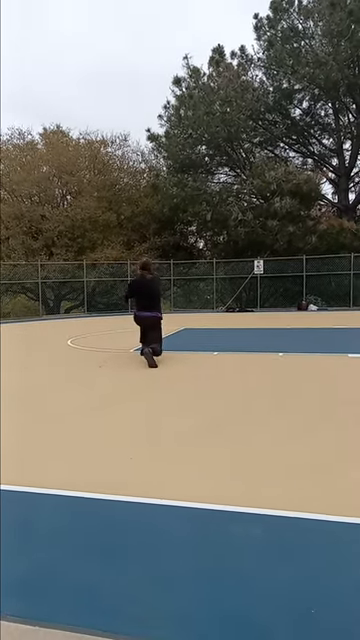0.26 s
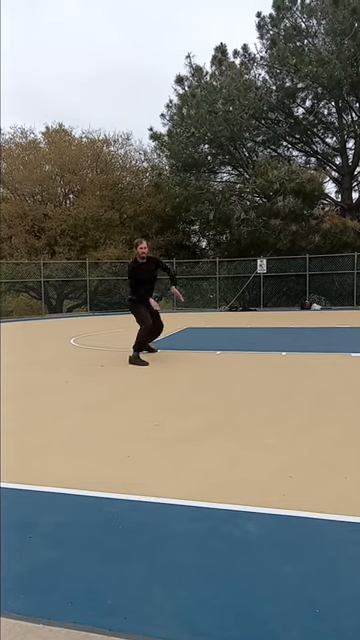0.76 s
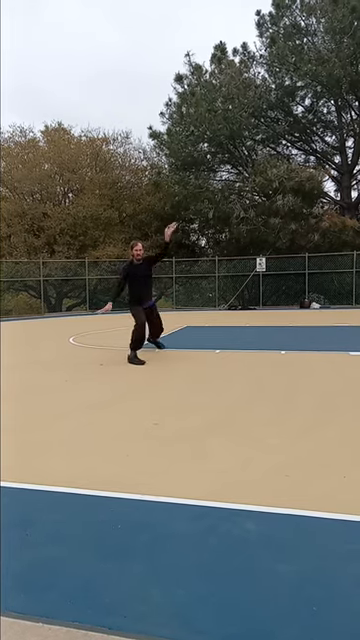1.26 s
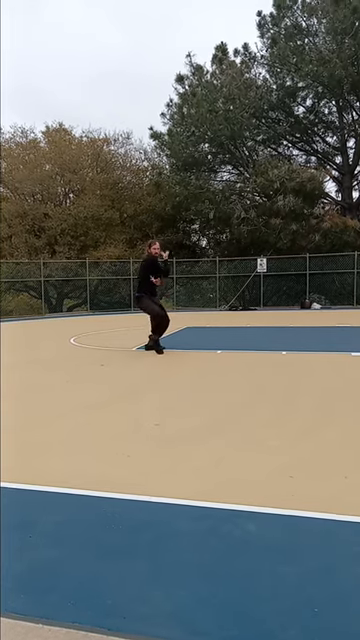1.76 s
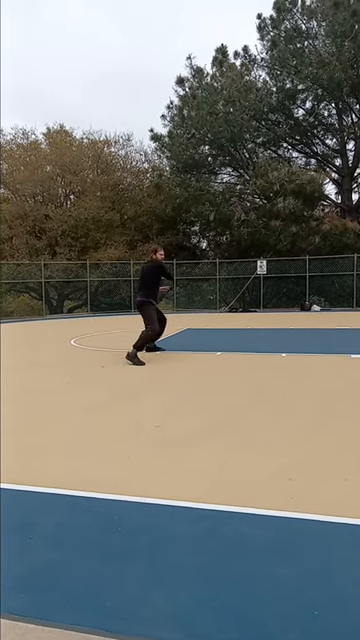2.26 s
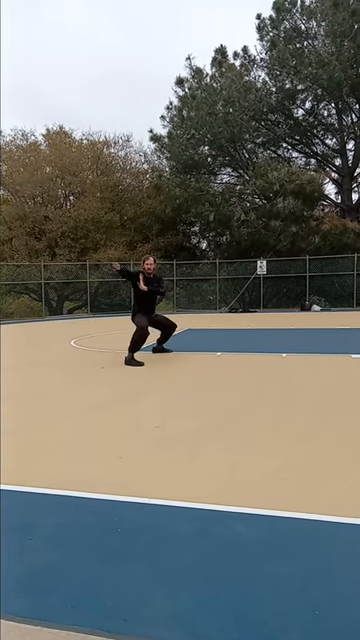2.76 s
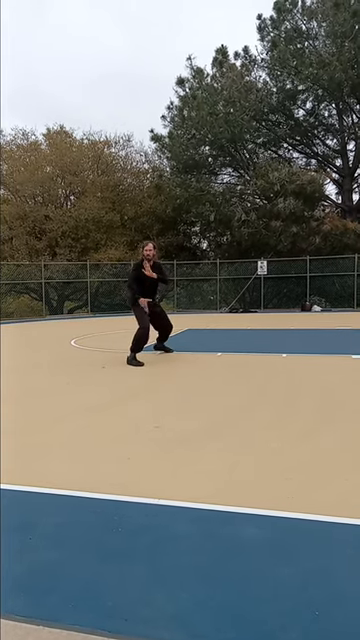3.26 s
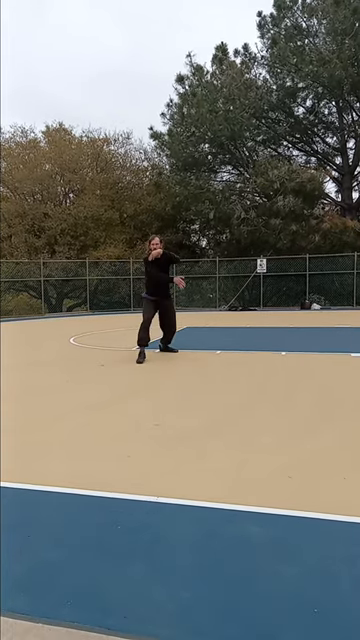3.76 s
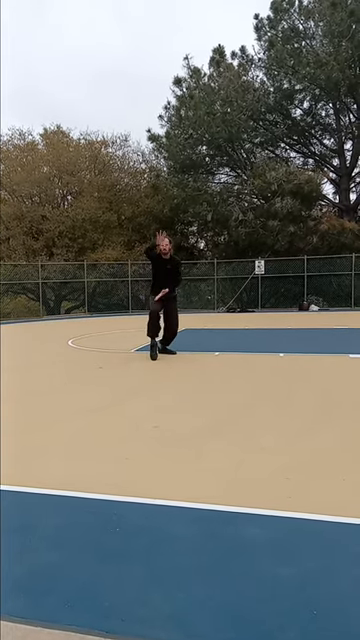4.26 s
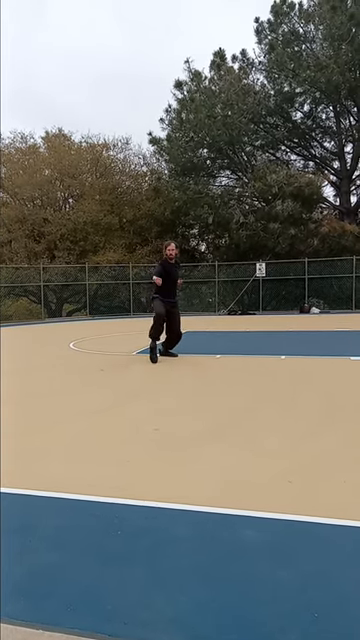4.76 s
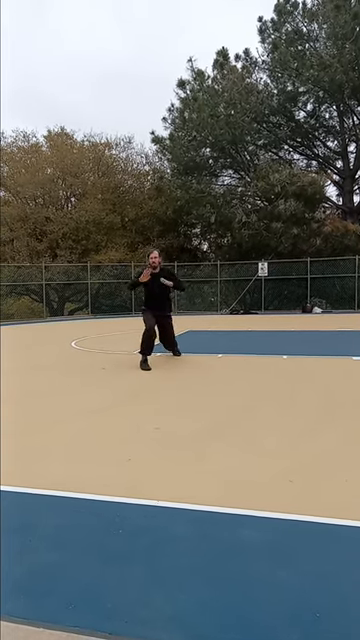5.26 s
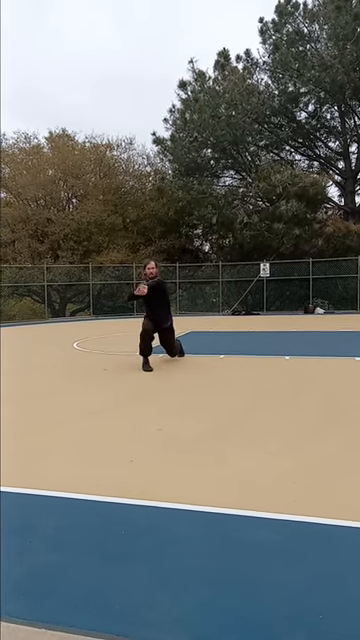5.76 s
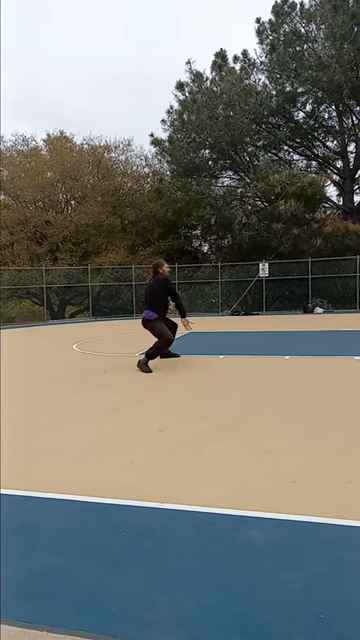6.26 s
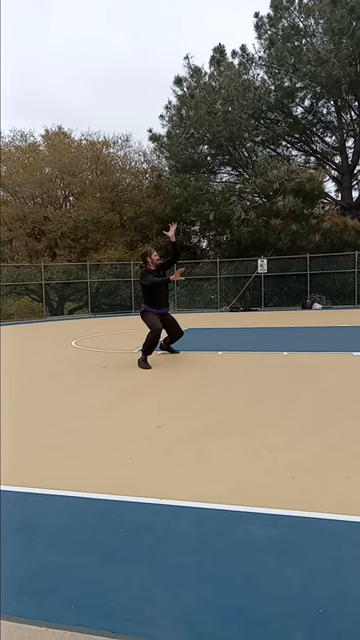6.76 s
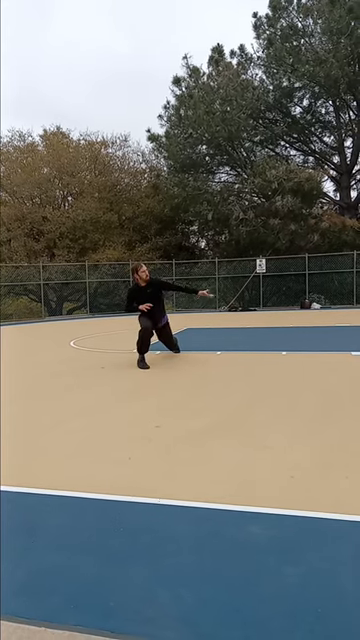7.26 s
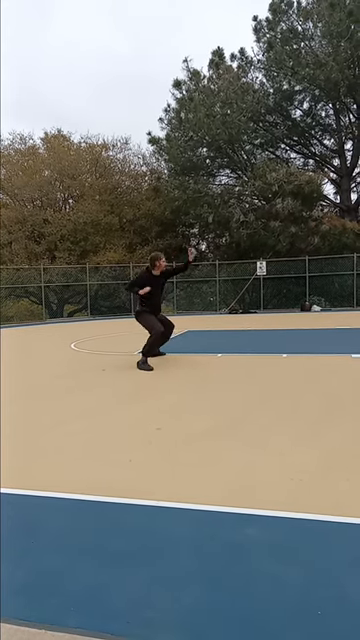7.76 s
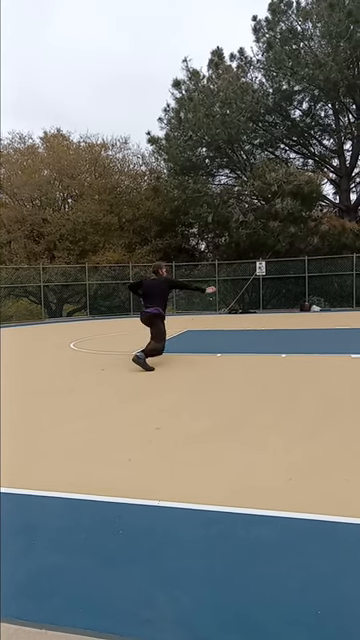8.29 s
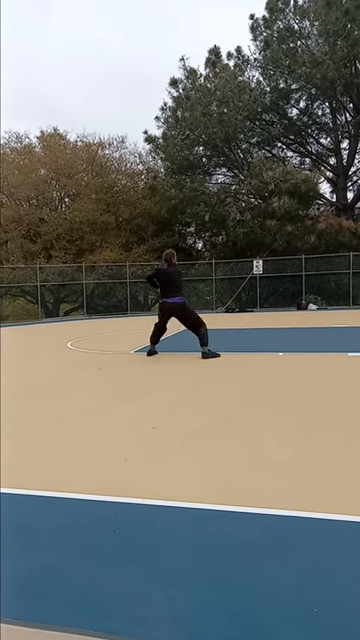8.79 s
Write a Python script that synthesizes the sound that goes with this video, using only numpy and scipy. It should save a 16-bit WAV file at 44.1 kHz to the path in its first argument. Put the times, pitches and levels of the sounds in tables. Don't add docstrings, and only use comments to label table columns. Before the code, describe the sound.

Dry rubber-soled scrapes with grit clicks and dull heel knocks, heard from a few metres away in open air with little echo. Landings are loudest in the first second and a half; the middle is mostly birds, quiet scuffs and a hissy sleeve swish; a sharp stamp comes close to the end. Faint wind puffs and a far vehicle sit underneath.

```python
import sys
import numpy as np
from scipy import signal
from scipy.fft import rfft, irfft, next_fast_len
from scipy.io import wavfile
from scipy.ndimage import uniform_filter1d, map_coordinates

SR = 44100
rng = np.random.default_rng(int(sys.argv[2]) if len(sys.argv) > 2 else 0)


def inscribe(sig):
    pcm = np.round(np.clip(np.atleast_2d(sig).T, -1, 1) * 32767)
    wavfile.write(sys.argv[1], SR, pcm.astype(np.int16))


def linear_from_db(decibels):
    return 10 ** (np.asarray(decibels, float) / 20)


N = 398214

# frequency in Hz, density in dB per Hz.
TOWN_COLOUR_DB = [(15, -21.5), (25, -32.5), (74, 0), (130, 2.5), (195, -2.5), (531, -24), (936, -17),
                  (1260, -19.5), (2550, -27.5), (4740, -29.5), (5430, -28.5), (6740, -30), (8360, -51),
                  (13200, -59), (16000, -49)]
# time in seconds, level in dB.
TOWN_LEVEL_DB = [(0.0, -57.5), (1.0, -58.5), (9.03, -61.5)]
# centre in seconds, level in dB, length in seconds.
GUSTS = [(0.26, -52.5, 0.025), (1.094, -50.5, 0.055), (1.52, -51, 0.029), (2.536, -54.5, .07),
         (3.19, -50, 0.035), (5.78, -61, .12), (1.97, -57, .04), (4.27, -56, .04), (3.67, -54.5, 0.064),
         (4.4, -61, 0.058), (5.3, -57, 0.042), (7.55, -56.5, .07), (1.844, -59.5, .05), (7.3, -57, 0.047),
         (6.796, -57.5, 0.14), (8.624, -56, 0.24)]
# frequency in Hz, gain in dB.
MIC_DB = [(25, -19), (55, -2.5), (13500, 0.5), (14500, 3), (15700, -0.5), (15900, -57)]
# nearest, rise and fall in seconds, level in dB, firing rate in Hz, climb in Hz per second.
VEHICLE = (3.0, 1, 2, -69.5, 41, 4.5)

# start and length in seconds, start pitch in Hz, level in dB.
CHIPS = [(0, 0.02, 5220, -57.5), (.144, 0.019, 5180, -45.5), (.916, .024, 5120, -48.5),
         (2.043, 0.063, 5180, -55.5), (2.44, 0.064, 5440, -50), (2.651, 0.03, 5400, -47.5),
         (2.698, .11, 5240, -48), (2.879, 0.026, 5700, -45), (2.96, 0.07, 5150, -47.5),
         (3.213, 0.13, 5110, -46), (4.081, 0.033, 5710, -37.5), (4.709, 0.032, 5160, -47.5),
         (5.051, 0.0313, 5770, -34), (5.461, 0.051, 5250, -58.5), (5.997, 0.025, 5690, -34.5),
         (6.416, 0.026, 4960, -57.5), (7.933, 0.052, 5670, -57), (1.222, 0.037, 5600, -42.5),
         (3.435, 0.05, 5230, -44.5), (7.432, 0.04, 5470, -65), (8.18, 0.045, 5450, -62),
         (8.736, 0.036, 5800, -42)]
DEEP_CHIPS = [
    (7.496, 0.03, 5530, -42.5),
]
CHIP_END_HZ, DEEP_CHIP_END_HZ = 5000, 4840
# start and length in seconds, start and end pitch in Hz, level in dB.
SONG = [(1.906, 0.034, 3530, 3220, -55), (1.963, 0.0077, 2840, 3530, -53), (2.077, .026, 3540, 4000, -62),
        (2.102, .013, 4150, 2960, -56), (2.12, 0.0154, 3000, 3900, -56), (2.137, 0.0095, 3830, 2840, -50),
        (2.246, 0.021, 4040, 3960, -55), (2.264, 0.025, 3710, 3000, -47), (2.302, 0.031, 3200, 3330, -47),
        (2.41, .03, 4250, 4400, -58), (2.423, .035, 5300, 3900, -61), (2.53, 0.013, 3700, 2850, -46.5),
        (2.571, 0.012, 2650, 3500, -57), (2.602, 0.014, 3740, 2930, -45), (2.686, .026, 4900, 4620, -50),
        (2.708, 0.036, 4600, 3470, -54), (2.736, 0.025, 3610, 3300, -42), (2.761, 0.03, 3750, 4400, -49.5),
        (2.901, 0.016, 3870, 3060, -47.5), (2.921, 0.032, 3416, 3476, -43.5),
        (3.016, 0.034, 3970, 3730, -57), (3.2, .045, 4250, 3500, -64.5), (3.054, 0.063, 3510, 3590, -55),
        (3.147, 0.051, 5680, 4060, -50), (3.235, .12, 3430, 3330, -44), (3.458, 0.039, 5600, 4950, -44.5),
        (3.489, 0.068, 4950, 2830, -51), (3.62, 0.021, 2950, 2400, -64), (3.788, 0.059, 3220, 2420, -50.5),
        (3.949, 0.076, 3270, 2420, -48.5), (7.765, .045, 3200, 2980, -63),
        (7.922, 0.065, 3240, 2900, -61.5)]
FAR_BIRDS = [(.108, 0.036, 2860, 3600, -72), (.586, 0.12, 2825, 2650, -66), (.66, 0.17, 3630, 4100, -68.5),
             (1.49, 0.19, 7600, 7390, -66), (2.213, 0.028, 4520, 4460, -65),
             (3.212, 0.071, 7200, 6360, -68), (4.134, 0.097, 4280, 4100, -59.5),
             (4.243, 0.088, 4240, 4510, -70), (4.642, 0.084, 7760, 7800, -72),
             (5.985, 0.04, 4050, 4200, -68), (6.09, 0.086, 4390, 4306, -62.5),
             (6.45, 0.037, 3100, 3140, -70), (6.553, .071, 4380, 4530, -61.5),
             (6.62, 0.15, 7400, 7630, -72), (5.33, .045, 3780, 3700, -74), (7.6, .06, 3110, 2950, -64),
             (8.22, 0.03, 3450, 3380, -65), (6.06, .025, 3850, 3750, -71), (8.118, 0.055, 4400, 4260, -62),
             (8.19, .09, 4460, 4440, -63.5), (4.11, .06, 2950, 2900, -68), (4.33, .04, 3420, 3350, -72),
             (4.385, .035, 3100, 3020, -68), (4.23, .04, 3150, 3050, -73), (6.335, .035, 4450, 4400, -72),
             (6.37, .025, 3950, 3550, -72), (5.81, .025, 6100, 6050, -73), (7.36, .05, 3500, 3450, -70)]
# peak, rise and fall in seconds, level in dB, pitch in Hz.
FAST_TRILLS = [
    (1.673, 0.011, 0.13, -49.5, 5440),
    (1.751, 0.013, 0.13, -41.5, 5430),
    (3.975, .2, 0.2, -50, 5370),
    (4.07, 0.1, 0.015, -54.5, 5320),
    (6.31, 0.038, 0.106, -51.5, 5350),
    (8.07, 0.12, 0.086, -51.5, 5290),
]
SLOW_TRILLS = [
    (4.364, 0.2, 0.11, -54, 5340),
    (4.51, 0.017, 0.12, -58.5, 5430),
    (4.7, 0.059, 0.02, -53, 5340),
    (4.27, .02, .06, -54, 5340),
    (6.04, .02, .11, -61, 5080),
    (5.045, 0.041, 0.0089, -53, 5430),
    (8.54, .02, 0.16, -56, 5220),
    (8.69, 0.079, 0.037, -58, 5280),
    (9.02, 0.2, 0.015, -53, 5320),
]
# blur in Hz, depth in dB, droop in Hz, clear notes in dB.
FAST_TEXTURE = (295, 16.2, 30, -1)
SLOW_TEXTURE = (81, 6, 25, -12)
TRILL_PER_S = 27

# frequency in Hz, density in dB per Hz.
CLOTH_COLOUR_DB = [(290, -36), (500, 26), (1140, -6.5), (1440, -4), (2190, -5), (6330, -2.5), (8700, -23),
                   (13300, -49), (16000, -30)]
# fastest, rise and fall in seconds, 6-7.3 kHz hiss in dB, 1.3-2.8 kHz body over hiss in dB.
SWISHES = [(2.48, 0.19, 0.19, -45.5, -13.5), (5.183, 0.085, 0.077, -46, -4.5),
           (5.24, 0.05, 0.11, -60.5, 12), (6.945, 0.26, 0.07, -58.5, 0), (9.02, 0.25, 0.058, -54, -17),
           (7.6, .03, 0.099, -56.5, -6), (2.55, 0.13, 0.14, -64, 12), (5.245, .05, .035, -52, -5),
           (8.56, .03, .08, -63, -8), (.47, .08, .1, -62, -4), (1.55, .03, .1, -63, -3)]
# body in kHz, fine hiss in dB.
FABRICS = [(2.2, -9), (2.47, -5), (1.61, -14), (1.75, 1), (1.47, -7), (2, -8), (1.7, -14), (2.2, -5),
           (2.2, -8), (3, -8), (3.2, -18)]
# comb spacing at start and end in Hz, strength 0-1.
GROUND_ECHOES = [(815, 905, .55), (890, 890, .85), (900, 960, .5), (965, 985, .6), (880, 880, .45),
                 (1500, 1500, .5), (840, 900, .75), (890, 900, .85), (900, 930, .8), (870, 900, .6),
                 (880, 860, .6)]
SWISH_DEPTH_DB, SWISH_FILL_DB = 22.5, 11
# time in seconds, level
# in dB, centre in Hz.
BREATHY_LOW = [(4.47, -61, 4020), (4.56, -54.5, 3350), (4.68, -74, 3050)]
BREATHY_MID = [(6.84, -72, 3020), (6.95, -67, 3130), (7.05, -76, 2960), (7.16, -72, 2850)]
BREATHY_DEEP = [(6.86, -78, 1950), (6.91, -67, 1860), (7.04, -78, 1875)]
BREATHY_BASS = [(6.78, -75, 950), (6.93, -65, 800), (7.0, -81, 780)]
BREATHY_HIGH = [(6.77, -67, 6320), (6.94, -61, 6620), (7.09, -79, 6840)]

# start in seconds, level in dB, pitch in Hz.
THUDS = [(.277, -45, 1340), (.315, -55.5, 990), (.35, -58, 814), (1.305, -53, 1300), (2.36, -61, 750),
         (2.526, -53, 2150), (5.29, -65.5, 750), (2.66, -68, 900), (5.82, -66, 2400), (3.728, -56, 950),
         (7.279, -62, 3550), (7.284, -56, 1950), (7.305, -60, 1400), (8.04, -56, 1500), (3.042, -49, 1500),
         (3.085, -57, 1600), (3.398, -64, 1310), (8.474, -63, 726), (8.819, -52.5, 1400)]
THUD_S = 0.0096
# start in seconds, peak in dB, sharp 9 kHz ring and low knock over the tick in dB.
TICKS = [(1.956, -48.5, -23, -2), (2.0744, -58.5, -8, -10), (2.9851, -47.5, -43, -17),
         (3.2824, -62, -30, 5), (3.319, -46, -37, -18), (3.386, -52, -40, -7), (4.8087, -55.5, -28, 23.5),
         (4.9725, -48, -23, -13), (4.931, -65, -35, 2), (5.036, -41.5, -36, -28), (7.56, -39, -33, -2),
         (7.793, -64, -20, -8), (4.155, -66, -30, -15), (4.196, -64, -22.5, -12), (4.27, -66, -30, -15),
         (6.449, -55, -35, -8), (6.475, -55, -35, -14), (6.499, -55, -28, -12), (6.864, -60, 0, -1),
         (8.4716, -32, -25, -17), (8.894, -55, -34, -7), (1.017, -60, -30, 2), (1.184, -56, -30, -6),
         (5.73, -60, -30, -4), (6.427, -60, -30, -6), (8.018, -50, -30, 0), (8.829, -48, -30, -8),
         (8.928, -58, -30, -2), (.327, -30, -14, -10), (1.327, -30, -16, -10), (8.4826, -33, -12, -10)]

# frequency in Hz, density in dB per Hz.
SOLE_COLOUR_DB = [(290, -59), (500, -5), (1570, -12), (1820, -14.5), (2980, -6.5), (4090, -6), (4530, -2),
                  (5020, -4.5), (6420, 3.5), (8330, -24.5), (13300, -49.5), (16000, -30)]
# start and slide in seconds, 6-7.3 kHz hiss in dB, 1.3-2.8 kHz weight over hiss in dB,
# sole body in kHz.
SKIDS = [(.281, 0.02, -42, -8.5, 1.39), (.303, 0.04, -33.5, -7, 1.84), (.348, 0.037, -41.5, -8.5, 1.46),
         (1.271, 0.011, -37, -4.5, 2.2), (1.288, 0.034, -33.5, -9.5, 2.17), (2.389, 0.0032, -57, 1, 2.4),
         (3.04, 0.02, -55.5, -6, 1.5), (3.07, 0.03, -50.5, -15, 1.47), (3.525, 0.065, -44, -3.5, 2.3),
         (3.612, 0.085, -44, -3, 1.9), (3.7, 0.073, -45.5, -1.5, 1.63), (3.462, 0.035, -61, 5.5, 2.3),
         (8.642, .035, -55, -6, 2.77)]
MORE_SKIDS = [
    (1.33, 0.035, -31, -12, 2.4),
    (1.378, .015, -39.5, -7, 2.4),
    (1.402, 0.053, -38, -7.5, 1.95),
    (1.475, 0.033, -37, -5.5, 2.3),
]
DRAGS = [
    (.22, 0.027, -45, -14.5, 3.5),
    (1.49, 0.0082, -53, -28, 1.03),
    (2.313, 0.05, -46.5, 1.5, 1.84),
    (3.59, 0.0073, -39.5, -11, 1.9),
    (.42, 0.12, -57.5, -12, 2.1),
    (3.27, 0.28, -69, -20, 1.2),
    (4.03, 0.44, -76, -9, 1.9),
    (4.96, 0.095, -68, -14, 1.7),
]
STAMPS = [
    (1.956, .005, -59.5, -6, 1.34),
    (7.281, 0.022, -62, 8, 1.7),
    (8.474, 0.031, -34, -4.5, 2.08),
]
# rise in seconds, sag in dB per second, stop and settle in seconds, dust above 8 kHz in dB.
SKID_SHAPE = (0.022, 89, 0.015, 0.14, 1.5)
DRAG_SHAPE = (0.084, 7.4, 0.02, .03, 0.12)
STAMP_SHAPE = (.004, 40, .016, .07, -1)
# closest and half length in seconds, hiss
# and weight in dB, sole body in kHz.
BRUSHES = [(7.505, 0.019, -47.5, -7.5, 2.7), (7.522, 0.02, -43.5, -4, 2.8), (7.557, 0.012, -44, -0.5, 3.9),
           (7.571, 0.022, -46, -2.5, 3.9), (1.454, .007, -33.5, -1.5, 2.4), (3.8, 0.05, -63, -18, 3.1),
           (7.326, 0.023, -58.5, -13, 2.7), (8.028, 0.032, -51.5, 0, 2.74), (8.056, 0.041, -52, 4.5, 2.18),
           (.59, 0.071, -59.5, -21, 1.6), (0.921, 0.051, -74.5, 6, 2.9), (1.112, .016, -58, -16, 1.2),
           (1.152, 0.045, -58, -12, 3), (2.796, 0.045, -58.5, 7.5, 2.3), (3.985, 0.044, -70, -13, 1.2),
           (5.778, .018, -78, 9.5, 2.3), (5.825, .04, -79, 9.5, 2.1), (6.48, 0.14, -73.5, -7, 2.8),
           (6.687, 0.12, -64.5, -11, 1.4), (8.83, 0.021, -49.5, -11, 0.71)]
FLICKS = [
    (.55, .09, -60, -22, 2.5),
    (4.767, 0.0048, -62.5, 2, 2.5),
    (4.46, 0.015, -71, 10, 1.94),
    (5.655, 0.15, -72, -1, 1.9),
    (7.18, 0.11, -67.5, -1, 1.4),
    (8.145, 0.029, -59, -10, 2.5),
]
EDGE_DB, STOP_DB, SETTLE_DB, BRUSH_DEPTH_DB = 29, 17, 27, 18.5
LEAN = 0.046
DUST_PER_DB, BRUSH_DUST_DB, FLICK_DUST_DB = 0.03, -2, 10


def evened(x):
    return x / np.sqrt(np.mean(x ** 2) + 1e-20)


def read(points, hz):
    f, value = np.transpose(points)
    return np.interp(np.log(hz + 1), np.log(f + 1), value)


def add(mix, start_s, sound):
    part = mix[round(start_s * SR):][:len(sound)]
    part += sound[:len(part)]


def slow(count, span):
    return evened(uniform_filter1d(uniform_filter1d(rng.standard_normal(count), span), span))


def tent(s, rise_s, fall_s, db, depth_db, before, at, after):
    foot_db = db - depth_db
    return [(s - 1.4 * rise_s, foot_db - 16, before),
            (s - rise_s, foot_db, before),
            (s, db, at),
            (s + fall_s, foot_db, after),
            (s + 1.4 * fall_s, foot_db - 16, after)]


def unroll(rows):
    s, *columns = np.transpose(rows)
    t = np.arange(s[0], s[-1], 1 / SR)
    db, *rest = (np.interp(t, s, c) for c in columns)
    fade = signal.windows.tukey(len(t), min(1, 260 / len(t)))
    return s[0], linear_from_db(db) * fade, *rest


def resonate(x, hz, width_hz):
    turn = np.exp(2j * np.pi * np.cumsum(hz * np.ones(len(x))) / SR)
    r = np.exp(-np.pi * width_hz / SR)
    return 2 * (turn * signal.lfilter([(1 - r) ** 2], [1, -2 * r, r * r], x / turn)).real


def blur(hz, width_hz):
    settle = 400
    count = len(hz) + settle
    z = rng.standard_normal(count) + 1j * rng.standard_normal(count)
    z = signal.sosfilt(signal.butter(7, width_hz / 2, fs=SR, output="sos"), z)[settle:]
    return evened((z * np.exp(2j * np.pi * np.cumsum(hz) / SR)).real)


def mottled(x, patchy_db, long, wide):
    z = signal.stft(x, nperseg=256)[2]
    patches = uniform_filter1d(rng.standard_normal(z.shape[::-1]), long, 0)
    patches = uniform_filter1d(patches, wide, 1).T
    return signal.istft(z * linear_from_db(patchy_db * evened(patches)), nperseg=256)[1][:len(x)]


def scatter(x, t60_s, gap_s):
    t = np.arange(SR // 2) / SR
    signs = rng.choice([-1., 1.], len(t)) * (rng.random(len(t)) < .05)
    taps = signs * linear_from_db(-60 * t / t60_s) * (t > gap_s)
    return signal.oaconvolve(x, taps / np.linalg.norm(taps))[:N]


def halves(x, colour, body_khz, dust_db):
    z, hz = rfft(x), np.fft.rfftfreq(len(x), 1 / SR)
    low = 1 / (1 + (hz / 4000) ** 4)
    octaves = np.log2((hz + 1) / (1000 * np.clip(body_khz, 1.15, 4.5)))
    hump_db = -8.8 * octaves ** 2 - 8.5 * np.minimum(octaves, 0) ** 2
    body = low * linear_from_db(read(colour, hz) + hump_db)
    treble = (1 - low) * linear_from_db(read(colour, hz) + dust_db * (hz > 8000))
    bands = ((treble, 6000, 7300), (body, 1300, 2800))
    return [irfft(z * g, len(x)) / np.sqrt(np.mean(g ** 2 * (hz > a) * (hz < b))) for g, a, b in bands]


def rub(rows, noise, colour, body_khz, dust_db):
    s, gain, weight_db = unroll(rows)
    piece = np.resize(noise[round(s * SR):], next_fast_len(len(gain)))
    treble, body = (v[:len(gain)] for v in halves(piece, colour, body_khz, dust_db))
    return s, gain * (treble + linear_from_db(weight_db) * body)


def town():
    frames, hz = N // 256 + 5, np.fft.rfftfreq(1024, 1 / SR)
    a, b, patches = rng.standard_normal((frames, 513, 3)).T
    patches = evened(uniform_filter1d(uniform_filter1d(patches, 10, 0), 16, 1))
    z = (a + 1j * b) * linear_from_db(read(TOWN_COLOUR_DB, hz)[:, None] + 0.77 * patches)
    hum = signal.istft(z * (hz < 400)[:, None], nperseg=1024, noverlap=768)[1]
    level = linear_from_db(np.interp(np.arange(N) / SR, *np.transpose(TOWN_LEVEL_DB)))
    return level * signal.istft(z, nperseg=1024, noverlap=768)[1][:N] / hum.std()


def wind():
    t = np.arange(N) / SR
    level = linear_from_db(-71 + 4.5 * slow(N, 3000))
    for s, db, length_s in GUSTS:
        level = level + linear_from_db(db) * np.exp(-((t - s) / length_s) ** 2)
    return level * evened(resonate(rng.standard_normal(N), 78.0, 45))


def traffic():
    s, rise_s, fall_s, db, hz, climb = VEHICLE
    s, gain, hz = unroll(tent(s, rise_s, fall_s, db, 20.5, hz - climb * rise_s, hz, hz + climb * fall_s))
    orders = sum(blur(k * hz, 8) for k in range(6, 11))
    roar = evened(resonate(rng.standard_normal(len(hz)), 323, 160))
    out = np.zeros(N)
    add(out, s, gain * (linear_from_db(-5.5) * orders + roar))
    return out


def note(length_s, start_hz, end_hz, db):
    u = np.arange(round((length_s + 0.048) * SR)) / (length_s * SR)
    fuzz_hz = 25 * linear_from_db(.5 * np.clip(-60.0 - db, 0, 25))
    bend = 1.7 if end_hz > 4600 else .7 if end_hz < 2600 else .85
    glide = np.clip(1 - u, 0, 1) ** bend
    hz = end_hz + (start_hz - end_hz) * glide + fuzz_hz * slow(len(u), 60)
    sung = np.clip(np.minimum(u, 1 - u) / 0.26, 0, 1)
    linger_db = -14.5 - abs(start_hz - end_hz) / 60 * (end_hz < 4600) - 690 * length_s * (u - 1)
    linger = linear_from_db(linger_db) * np.clip((u - .8) / 0.22, 0, 1)
    shape = np.maximum(sung, linger) * signal.windows.tukey(len(u), .04)
    return linear_from_db(db + 1.0 + 1.1 * slow(len(u), 120)) * shape * np.sin(2 * np.pi * np.cumsum(hz) / SR)


def bird_notes():
    near, far = np.zeros((2, N))
    for table, end_hz in ((CHIPS, CHIP_END_HZ), (DEEP_CHIPS, DEEP_CHIP_END_HZ)):
        for s, length_s, hz, db in table:
            add(near, s, note(length_s, hz, end_hz, db))
    for s, *row in SONG:
        add(near, s, note(*row))
    for s, *row in FAR_BIRDS:
        sung = note(*row)
        add(far, s, sung * (.8 + .5 * slow(len(sung), 250)))
    return near + 0.79 * far + linear_from_db(-4.5) * scatter(far, .15, .003)


def bird_trills():
    out = np.zeros(N)
    for table, texture in ((FAST_TRILLS, FAST_TEXTURE), (SLOW_TRILLS, SLOW_TEXTURE)):
        width_hz, depth_db, droop_hz, clear_db = texture
        for *row, hz in table:
            s, gain, hz = unroll(tent(*row, depth_db, hz + droop_hz, hz, hz - droop_hz))
            beat = np.arange(len(hz)) * TRILL_PER_S / SR % 1
            fall_hz = hz + width_hz * (.5 - beat ** 2)
            falls = np.sin(np.pi * beat) * np.sin(2 * np.pi * np.cumsum(fall_hz) / SR)
            add(out, s, gain * evened(blur(hz, width_hz) + linear_from_db(clear_db) * evened(falls)))
    return out


def cloth():
    hiss = rng.standard_normal(N) * linear_from_db(0.62 * slow(N, 100))
    hiss = evened(mottled(hiss, patchy_db=3.6, long=22, wide=2))
    out = np.zeros(N)
    for (*row, full_db), fabric, (start_hz, end_hz, echo) in zip(SWISHES, FABRICS, GROUND_ECHOES):
        rows = tent(*row, SWISH_DEPTH_DB, full_db, full_db, full_db + SWISH_FILL_DB)
        s, direct = rub(rows, hiss, CLOTH_COLOUR_DB, *fabric)
        at = np.arange(len(direct))
        source = at - SR / np.linspace(start_hz, end_hz, len(at))
        late = map_coordinates(direct, [source])
        later = map_coordinates(late, [source])
        add(out, s, (direct + 1.25 * echo * late + 0.45 * echo * later) / (1.15 + 1.3 * echo))
    return out


def breathy_bands():
    out = np.zeros(N)
    breaths = ((BREATHY_LOW, 550), (BREATHY_HIGH, 330), (BREATHY_MID, 150), (BREATHY_DEEP, 300), (BREATHY_BASS, 220))
    for rows, width_hz in breaths:
        s, gain, hz = unroll(rows)
        add(out, s, gain * blur(hz, width_hz))
    return out


def heels():
    out, u = np.zeros(N), np.arange(3000) / (THUD_S * SR)
    for s, db, hz in THUDS:
        ring = evened(resonate(rng.standard_normal(len(u)), hz, 0.2 * hz))
        add(out, s, linear_from_db(db) * u * np.exp(1 - u) * ring)
    return out


def ticks():
    out, t = np.zeros(N), np.arange(900) / SR
    for s, db, sharp_db, knock_db in TICKS:
        crack = rng.standard_normal(len(t)) * linear_from_db(-60 * t / 0.018)
        rings = ((6320, 1300, 0), (9180, 430, sharp_db), (2550, 1050, knock_db))  # Hz, width Hz, dB
        tick = np.zeros(len(t))
        for hz, width_hz, ring_db in rings:
            ring = resonate(resonate(crack, hz, 2 * width_hz), hz, width_hz)
            tick += linear_from_db(ring_db) * ring / abs(ring).max()
        add(out, s, linear_from_db(db) * tick)
    return out


def stroke(s, slide_s, db, weight_db, rise_s, sag_db_per_s, stop_s, settle_s):
    times = s + np.cumsum([-rise_s, rise_s, slide_s, stop_s, settle_s])
    under_db = np.array([EDGE_DB, 0, 0, STOP_DB, STOP_DB + SETTLE_DB])
    sag_db = sag_db_per_s * slide_s * np.array([0, 0, 1, 1, 1])
    return np.transpose([times, db - under_db - sag_db, weight_db + LEAN * under_db])


def slipping():
    grains = 1.5 * rng.standard_normal(N) * (rng.random(N) < 700 / SR)
    slips = rng.standard_normal(N) * linear_from_db(0.78 * slow(N, 30) + 0.9 * slow(N, 200))
    return evened(evened(mottled(slips, patchy_db=3.3, long=8, wide=4)) + grains)


def soles():
    slips, out = slipping(), np.zeros(N)
    strokes = ((SKIDS, SKID_SHAPE), (MORE_SKIDS, SKID_SHAPE), (DRAGS, DRAG_SHAPE), (STAMPS, STAMP_SHAPE))
    for table, (*shape, dust_db) in strokes:
        for s, slide_s, db, weight_db, khz in table:
            rows = stroke(s, slide_s, db, weight_db, *shape)
            faint_dust_db = DUST_PER_DB * max(-50 - db, 0)
            add(out, *rub(rows, slips, SOLE_COLOUR_DB, khz, dust_db + faint_dust_db))
    for table, dust_db in ((BRUSHES, BRUSH_DUST_DB), (FLICKS, FLICK_DUST_DB)):
        for s, half_s, db, weight_db, khz in table:
            ends_db = weight_db + LEAN * BRUSH_DEPTH_DB
            rows = tent(s, half_s, half_s, db, BRUSH_DEPTH_DB, ends_db, weight_db, ends_db)
            add(out, *rub(rows, slips, SOLE_COLOUR_DB, khz, dust_db))
    return out


def scene():
    background = town() + wind() + traffic()
    notes, trills = bird_notes(), bird_trills()
    trees = linear_from_db(-8.5) * scatter(notes, 0.17, 0.0056) + linear_from_db(-22.5) * scatter(notes + trills, 0.64, 0.037)
    drill = heels() + ticks() + soles()
    fence = linear_from_db(-22) * scatter(drill, .13, .006)
    return (background + notes + trills + trees + cloth() + breathy_bands() + drill + fence)[None]


def band_limit(x):
    return signal.sosfilt(signal.butter(12, 16320, fs=SR, output="sos"), x)


def record(dry):
    heard = irfft(rfft(dry) * linear_from_db(read(MIC_DB, np.fft.rfftfreq(N, 1 / SR))), N)
    return band_limit(heard)


dry = scene()
out = record(dry)
inscribe(out)
```